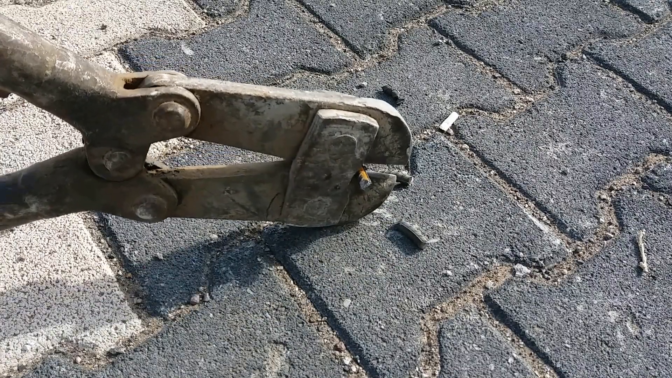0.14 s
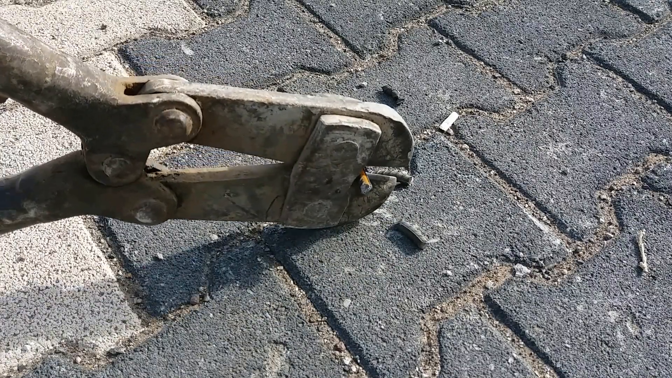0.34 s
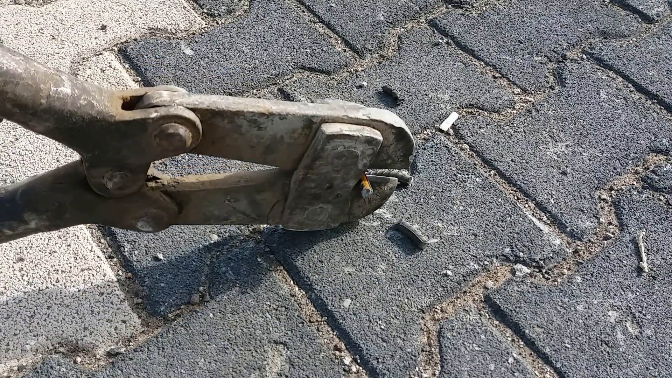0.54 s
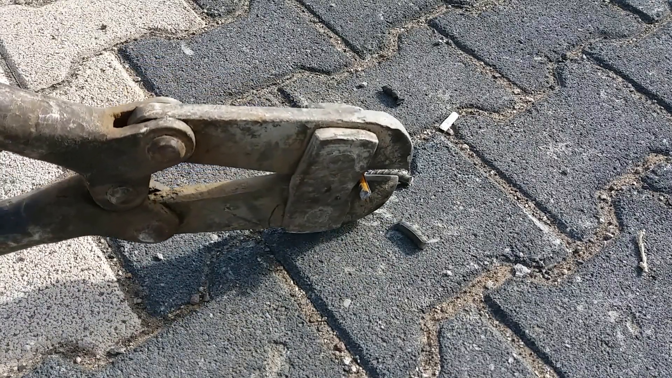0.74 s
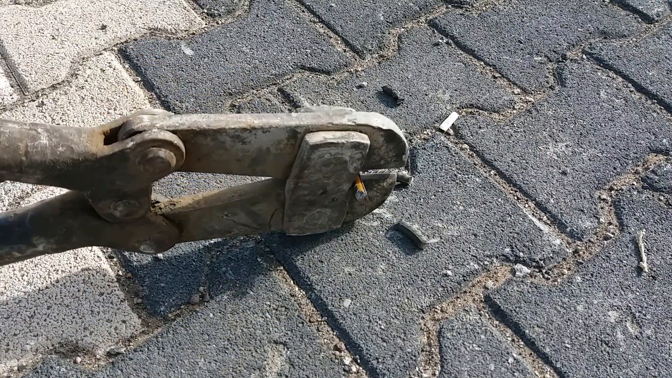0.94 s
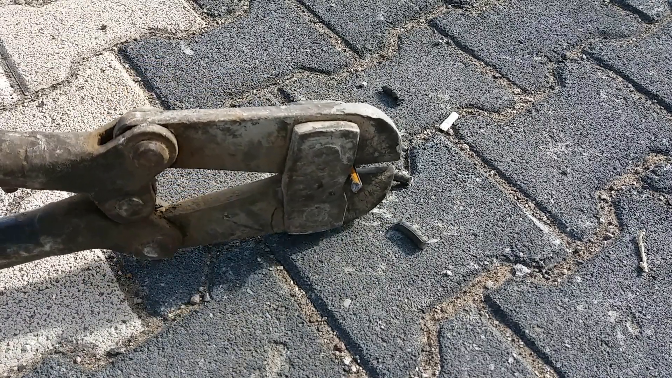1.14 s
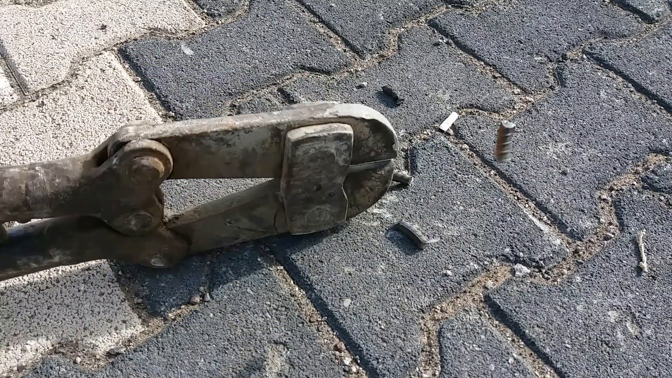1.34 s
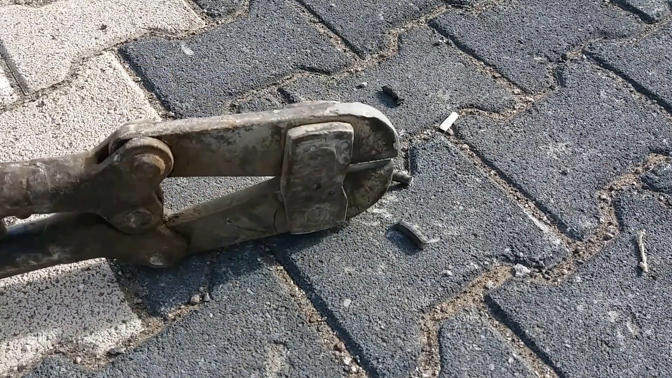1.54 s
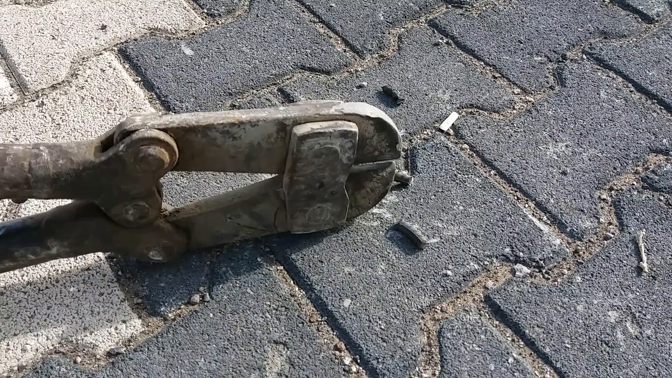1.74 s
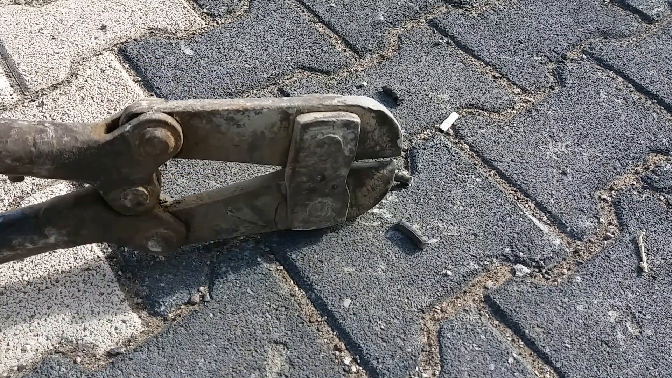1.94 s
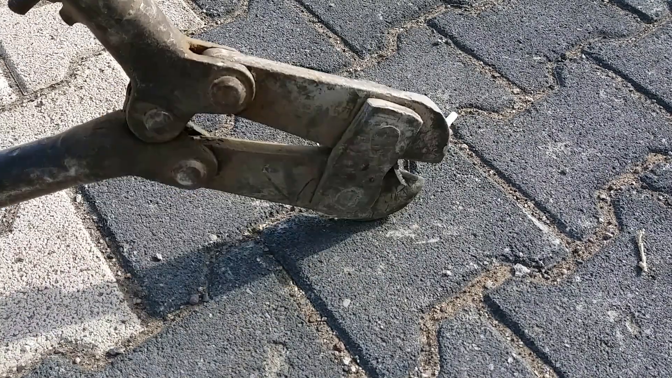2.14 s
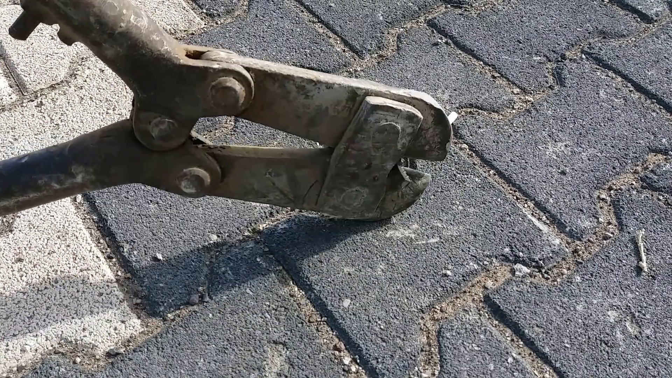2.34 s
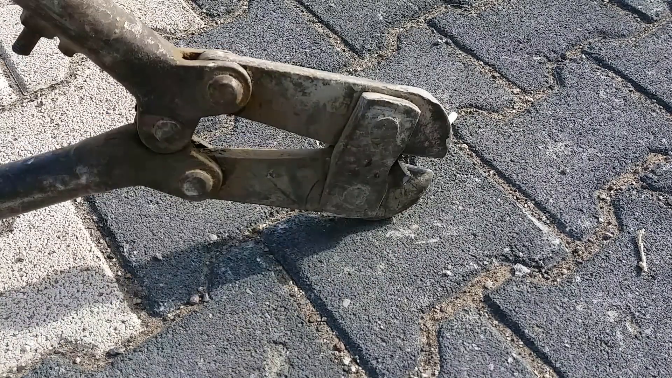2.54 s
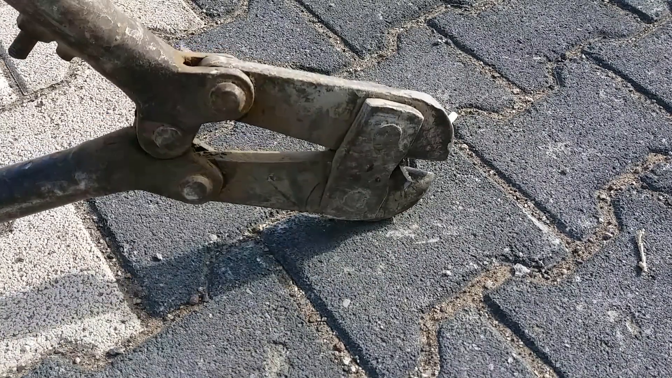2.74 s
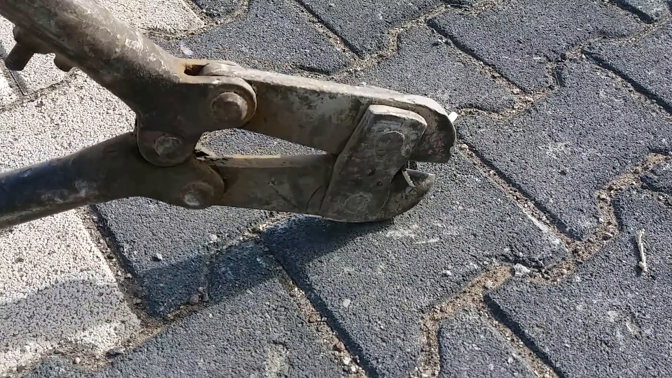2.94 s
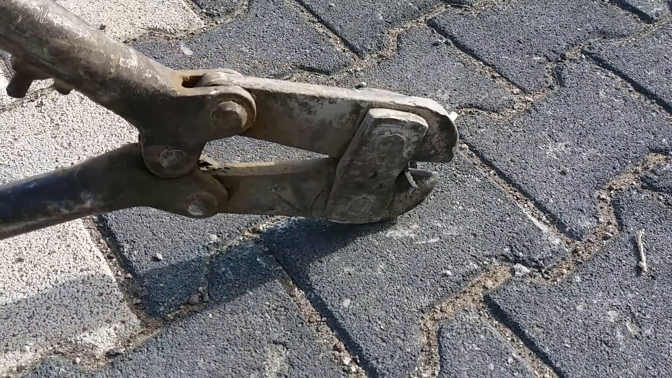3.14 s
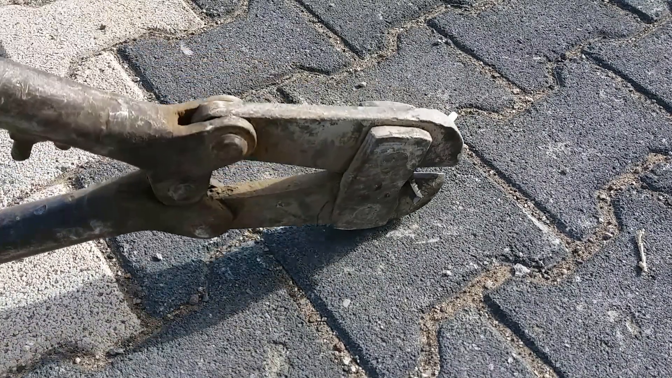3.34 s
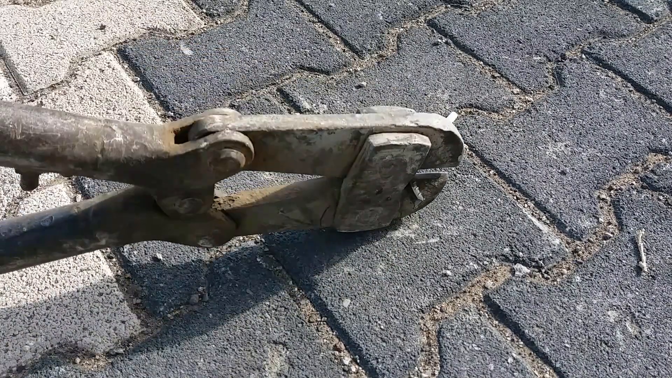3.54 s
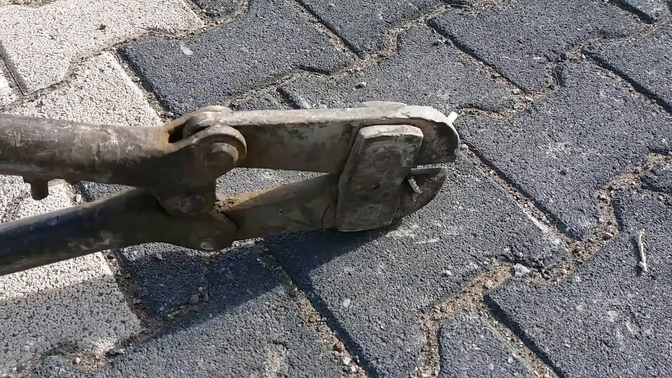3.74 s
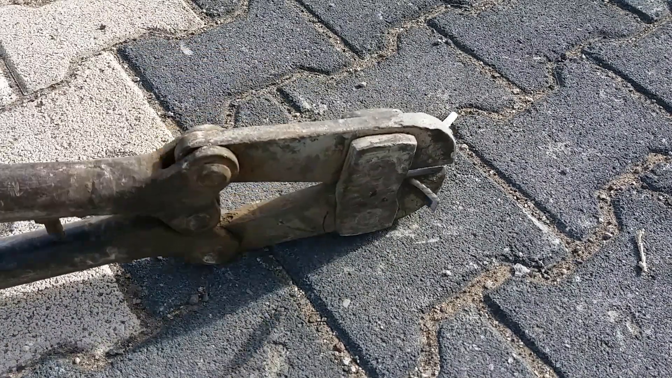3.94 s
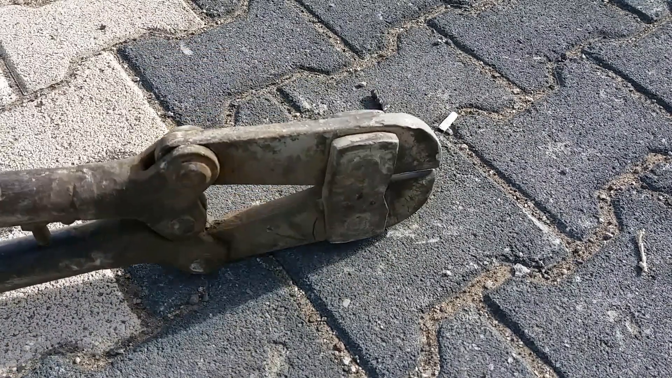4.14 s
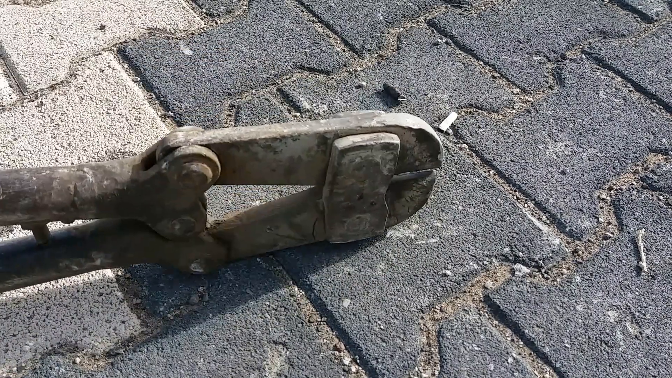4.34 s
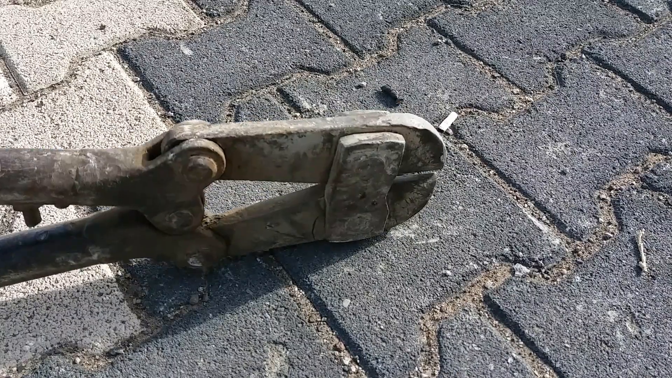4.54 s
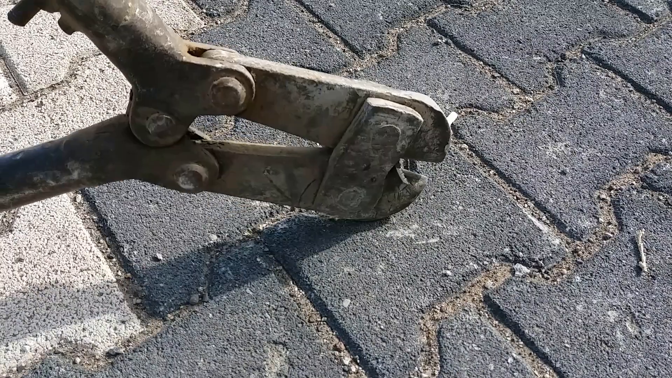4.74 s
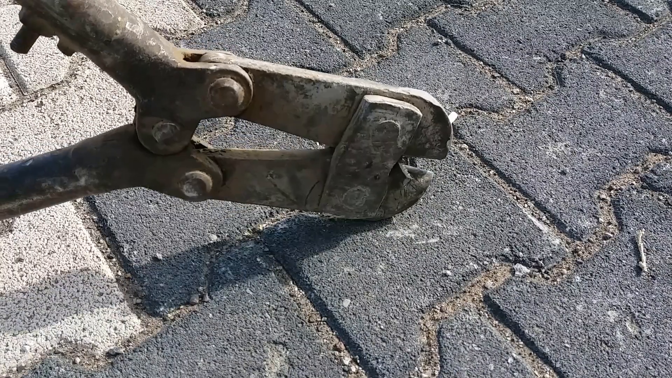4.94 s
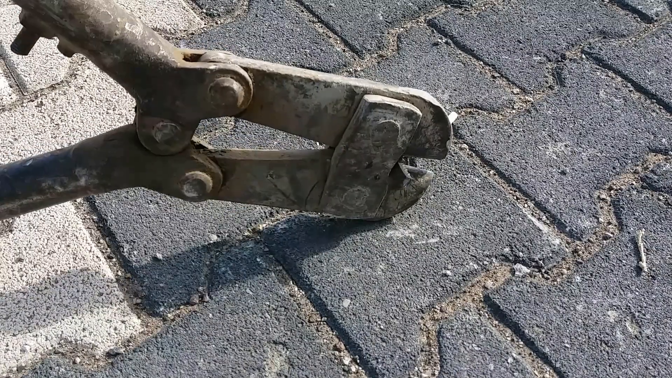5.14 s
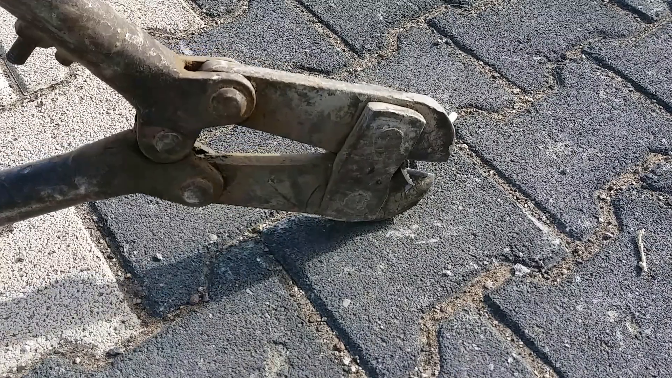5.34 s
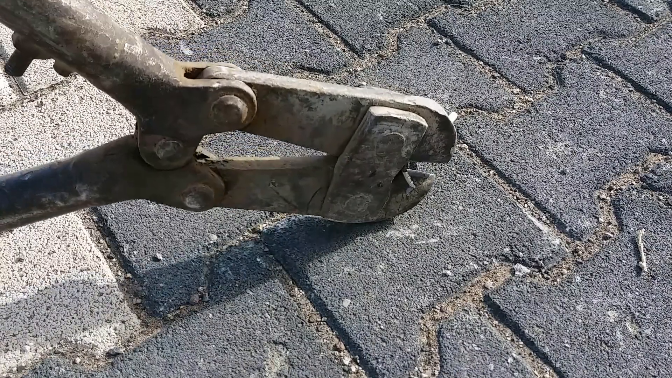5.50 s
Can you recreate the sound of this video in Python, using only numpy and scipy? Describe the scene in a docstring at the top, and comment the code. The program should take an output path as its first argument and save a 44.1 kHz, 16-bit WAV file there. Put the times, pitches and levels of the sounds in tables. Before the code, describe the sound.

Two violent steel snaps with short jaw ring and wall echo, separated by scraping on gritty stone and light ticking metal.

```python
"""Paved yard: large bolt cutters snap two steel rods close to a stereo microphone that clips on the cracks.
Cracks are noise bursts plus ringing jaw modes, echoed by nearby walls; offcuts tick over the stones.
Between cuts, shoes and tool shuffle on the grit to the left: clumped noise through resonances.
Knocks are wavering tones, loose steel chinks are short modes. Shaped noise gives a low rumble that comes
and goes over a quiet outdoor floor. The shuffling passage is played a second time."""
import sys
import numpy as np
from scipy import signal
from scipy.fft import rfft, irfft
from scipy.io import wavfile
from scipy.ndimage import uniform_filter1d

SR = 44100
rng = np.random.default_rng(int(sys.argv[2]) if len(sys.argv) > 2 else 0)


def pcm_store(signal):
    """Save signal as 16-bit PCM."""
    levels = np.round(np.clip(np.atleast_2d(signal), -1, 1) * 32767)
    wavfile.write(sys.argv[1], SR, levels.astype(np.int16).T)


N = 250047
T = np.arange(int(.5 * SR)) / SR  # time axis of one short event [s]
LEFT_LEAD_S = .00036

# blows on the cutter: (time [s], level [dB], treble [dB], ring [dB], share of free ring time [1])
BLOWS = [(1.2986, 4.5, 1.5, 0, 0.26), (1.305, 0, 4, 5.5, 0.13), (1.313, -7, -13, 1, 0.22),
         (1.3343, -1.5, -14, -21, 0.097), (1.3518, 2, -23, -6, 0.11), (1.358, -6, -29, -2, 0.27),
         (1.3782, -22.5, -32, 11.5, 0.54), (3.9648, 1.5, -1, -5, 0.17), (3.973, -4.5, -4, 2.5, 0.12),
         (3.999, -15, -27, -2, 0.048), (4.0176, -18.5, -25, 8, 0.11), (4.047, -0.5, -17, -24, 0.074),
         (4.0544, -10, -13, 1, 0.28)]


def cutter():
    """The rod parts with a crack; the jaws slam, rebound and ring."""
    out = np.zeros((2, N))
    for s, db, treble_db, ring_db, free in BLOWS:
        burst = ears(*crack(2900, treble_db, 0.035), 0.17, LEFT_LEAD_S, 0.93)
        blow = 0.54 * burst + undb(ring_db) * ring(treble_db, free)
        add(out, s, undb(db) * blow)
    return out


# modes of the jaws: (frequency [Hz], relative level [dB], free t60 [s])
JAW_MODES = [(1410, -12, .13), (1840, -3, .24), (1960, -11, .2), (2235, -3, .45), (2335, -8, .3),
             (2550, -9, .2), (3265, -4, .28), (3410, -8, .15), (4455, -4, .24), (5780, -2, .09),
             (6565, -11, .2), (7125, -12, .15), (9685, -11, .15), (10990, -13, .2)]


def ring(treble_db, free, near_hz=1, focus_db_per_octave=0):
    """Jaw modes: dull blows reach the high ones less, loose joints flutter, light taps favour near_hz."""
    hz, db, t60 = np.transpose(JAW_MODES)[:, :, None]
    level_chance, phase_chance, place_chance = rng.standard_normal((3, len(JAW_MODES), 1))
    knots = np.linspace(0, T[-1], 80)
    flutter = np.array([np.interp(T, knots, c) for c in rng.standard_normal((len(JAW_MODES), 80))])
    dullness = min(treble_db, 0) * np.clip((hz - 3500) / 2000, 0, 1)
    focus = focus_db_per_octave * np.abs(np.log2(hz / near_hz))
    db = db + dullness + level_chance + 3.9 * flutter - focus
    # contact with the stone damps most of the ring; a little sings on freely
    damped = np.exp(-np.log(1000) * T / (t60 * max(free, .03)))
    singing = undb(-10.5) * free * np.exp(-np.log(1000) * T / t60)
    envelope = undb(db) * (damped + singing) * (1 - np.exp(-T / 0.00047))
    left = envelope * np.exp(2j * np.pi * (hz * T + phase_chance))
    # each port hears the modes at its own time and from another part of the jaws
    right = left * np.exp(1j * (1.7 * place_chance - 2 * np.pi * hz * LEFT_LEAD_S))
    return np.array([left.imag.sum(0), right.imag.sum(0)]) / 3


def crack(hz, treble_db, t60):
    """Noise burst: broad body around hz, shorter hiss above; two unrelated draws."""
    body_shape = [(hz / 8, -13), (hz / 2, -3), (hz, 0), (hz * 1.32, -5), (hz * 2.22, -20), (22050, -60)]
    draws = []
    for _ in range(2):
        body = colour(rng.standard_normal(len(T)), body_shape) * fade(t60, 0.00026)
        hiss = colour(rng.standard_normal(len(T)), GRIT_SPECTRUM) * fade(0.67 * t60, .0001)
        draws.append(body + undb(treble_db) * hiss)
    return draws


# spectrum of the echo from nearby walls: (frequency [Hz], density [dB per Hz])
ECHO_SPECTRUM = [(100, -3.5), (500, 2), (3000, -4.5), (8000, 0), (16000, -15.5)]
ECHO_DB, ECHO_T60_S = -12, 0.25


def wall_echo(cracks):
    """Nearby walls return the cracks: convolution with decaying noise, one draw per port."""
    echo = []
    for port in cracks:
        tail = colour(rng.standard_normal(len(T)), ECHO_SPECTRUM) * fade(ECHO_T60_S, 0.0028)
        tail = tail / np.sqrt(np.sum(tail ** 2))
        echo.append(signal.fftconvolve(port, tail)[:N])
    return undb(ECHO_DB) * np.array(echo)


# offcuts, grit and loose parts ticking on stone:
# (time [s], level [dB], centre [Hz], treble [dB], jaw ring [dB], left bias [dB before PAN_SHARE])
TICKS = [(1.556, -43.5, 4360, 9.5, 9, -13), (1.5703, -24.5, 3200, 5, -3, -0.5),
         (1.617, -27, 3140, -15, 1, -17), (1.723, -47.5, 4360, 10.5, -0.5, 2.5),
         (1.7331, -34.5, 4340, 6, -4, -15), (2.3134, -28, 2268, 10, -16, 8),
         (2.3244, -14.5, 2420, -15, -18, -1), (2.3430, -14.5, 3260, -4.5, 2, 0.5),
         (2.349, -18, 2580, -6, -8, 14), (2.35, -14.5, 5000, 1, -7, 2), (3.07, -35.5, 3020, 6, -8, 14),
         (3.1183, -28, 1910, -4, -10, -6), (3.4294, -23, 2950, -7.5, -9, 1),
         (3.4852, -36.5, 1960, 4.5, -10, -1.5), (3.945, -28, 3430, -5, -1, 22),
         (4.1551, -9, 2970, -11, -2, 1.5), (4.1801, -13, 2370, -20, -3, -1), (4.293, -44, 2220, -30, 18, 3),
         (4.3369, -22, 3060, -44, 10.5, 11), (4.4742, -22.5, 2160, -54, -2, 1.5),
         (4.5352, -20, 2860, -44, -15, 6), (4.631, -29.5, 2730, -23, 4, 9)]
PAN_SHARE = 0.72


def ticks():
    """Dry contacts that stir the steel briefly; the louder port is also the earlier one."""
    out = np.zeros((2, N))
    for s, db, hz, treble_db, ring_db, pan_db in TICKS:
        lead_s = LEFT_LEAD_S * np.clip(pan_db / 2, -.7, 1)
        burst = ears(*crack(hz, treble_db, 0.0087), 1.0, lead_s, PAN_SHARE * pan_db)
        steel = ring(treble_db, 0.15, hz, focus_db_per_octave=14.0)
        add(out, s, undb(db) * (burst + undb(ring_db) * steel))
    return out


# chinks as the handles load: (time [s], level [dB], ring [dB], click centre [Hz])
CHINKS = [(0.294, -36.5, -18, 1280), (0.4256, -42.5, -18, 2260), (0.449, -44.5, -14, 1530),
          (0.598, -40, -27, 1370), (0.69, -35, -12, 1900), (0.6964, -28.5, -8, 1870),
          (0.783, -31, -35, 805), (0.848, -36, -16, 2580), (0.8703, -36, -20.5, 1870),
          (1.07, -49, -28, 750)]
# modes of the small loose steel part: (frequency [Hz], relative level [dB], t60 [s])
PART_MODES = [(1770, 1.5, 0.023), (4550, 4, 0.032), (8960, -8, 0.039), (10000, 6, 0.056), (10400, 3, 0.057)]


def chinks():
    """A loose part chinks on the left: a short click and a few clear, quickly fading modes."""
    out = np.zeros((2, N))
    hz, mode_db, t60 = np.transpose(PART_MODES)[:, :, None]
    for s, db, ring_db, click_hz in CHINKS:
        level_chance, phase_chance = rng.standard_normal((2, len(PART_MODES), 1))
        envelope = undb(mode_db + 2.0 * level_chance) * np.exp(-np.log(1000) * T / t60)
        modes = envelope * np.sin(2 * np.pi * (hz * T + phase_chance))
        click, other = crack(click_hz, ring_db + 5, 0.016)
        near = undb(ring_db) * modes.sum(0) + click
        add(out, s, undb(db) * ears(near, other, 0.6, LEFT_LEAD_S, 5.0))
    return out


# hollow knocks of soles and handles: (time [s], level [dB], pitch [Hz], length [s])
KNOCKS = [(0.727, -43.5, 287, 0.12), (1.006, -34, 144, 0.0071), (1.094, -27, 129, 0.011),
          (1.296, -14.5, 92, 0.015), (1.337, -16.5, 492, 0.006), (1.559, -29, 524, 0.0019),
          (2.31, -20, 412, 0.011), (2.324, -16, 510, 0.0039), (2.810, -17, 825, 0.021),
          (2.85, -22, 288, 0.0072), (3.035, -37, 700, 0.059), (3.115, -19, 838, 0.029),
          (3.435, -18.5, 796, 0.0058), (3.969, -15, 697, 0.014), (4.008, -15, 490, 0.004),
          (4.016, -11.5, 800, 0.004), (4.048, -11.5, 845, 0.01), (4.137, -29.5, 605, 0.0075),
          (4.182, -19, 690, 0.0031), (4.369, -31.5, 1024, 0.013), (4.337, -16.5, 854, 0.0049),
          (4.474, -26.5, 540, 0.002), (4.535, -14.5, 686, 0.0035)]


def knocks():
    """A hollow, wavering tone held while the contact lasts, in a dull noise burst."""
    out = np.zeros((2, N))
    for s, db, hz, length_s in KNOCKS:
        rise = 1 - np.exp(-T / (0.082 * length_s))
        shape = rise * np.exp(-(T / max(length_s, .002)) ** 3.4)
        waver = .03 * np.cumsum(rng.standard_normal(len(T)))
        burst, other = crack(1.69 * hz, -60.5, 3 * length_s)
        near = shape * np.sin(2 * np.pi * hz * T + waver) + undb(-4.5) * burst
        pan_db = -5.5 * max(np.log2(240 / hz), 0)  # the lowest are louder on the right
        add(out, s, undb(db) * ears(near, other, 0.84, LEFT_LEAD_S, pan_db))
    return out


# hollow resonances of the drag: (frequency [Hz], width [Hz], relative level [dB])
DRAG_MODES = [(260, 60, -5.5), (309, 132, -3.5), (398, 140, -4.5), (481, 220, -2), (694, 373, -5),
              (900, 590, 0.5)]
# rasp of stone: (frequency [Hz], density [dB per Hz])
RASP_SPECTRUM = [(600, -6), (1200, 9.5), (2000, 9.5), (2800, 0), (4500, -1.5), (7000, -23), (10000, -37)]
# hiss of fine grit, also in the cracks: (frequency [Hz], density [dB per Hz])
GRIT_SPECTRUM = [(2500, -6.5), (5000, -3.5), (7500, -4), (10000, -1), (13000, -3), (15000, -4), (16500, -8)]
STEEL_DB = -8  # grit nicking the jaws, against the rasp gain


def shuffle():
    """Stick-slip contacts excite hollow drag and stone rasp; grit nicks the jaws and hisses above."""
    drag, rasp, grit = scuffing()
    hollow = [hollow_drag() for _ in range(2)]
    out = drag * ears(*hollow, 0.93, LEFT_LEAD_S, 0.36)
    stone = [colour(patches(610, count=9, scatter_db=5.0, length_s=.006), RASP_SPECTRUM) for _ in range(2)]
    out += rasp * ears(*stone, 0.33, LEFT_LEAD_S, 3.2) * undb(2.0)
    peaks = [(hz, 0.023 * hz, db - 10.0 * np.log2(hz / 2000)) for hz, db, _ in JAW_MODES[:9]]
    steel = [resonate(nicks(), peaks) for _ in range(2)]
    out += rasp * ears(*steel, 0.24, LEFT_LEAD_S, 1.5) * undb(STEEL_DB)
    hiss = [colour(grains(1.5, 0.0035), GRIT_SPECTRUM) for _ in range(2)]
    return out + grit * ears(*hiss, 0.02, LEFT_LEAD_S, 4.6) * undb(2.5)


def hollow_drag():
    """Each drag resonance is excited by its own clumped contacts; rms 1."""
    return unit(sum(undb(db) * resonate(grains(3.84, .01), [(hz, width, 0)]) for hz, width, db in DRAG_MODES))


def patches(lo_hz, count, scatter_db, length_s):
    """Half-octave bands, each clumping on its own: a scrape wanders over many small resonances."""
    bands = lo_hz * 2 ** (np.arange(count) / 2)
    return sum(np.sqrt(hz) * resonate(grains(scatter_db, length_s), [(hz, hz / 1.9, 0)]) for hz in bands)


NICKS_PER_S = 300


def nicks():
    """Grains of grit nick the jaws: clicks at random times, a few much louder than the rest."""
    hits = rng.random(N) < NICKS_PER_S / SR
    return hits * undb(4.4 * rng.exponential(size=N)) * np.sign(rng.standard_normal(N))


# faint scraping between scuffs: (time [s], drag level [dB])
SCRAPING = [(0.66, -63.5), (0.98, -52), (1.05, -49.5), (1.42, -52), (1.65, -55), (1.9, -63.5), (2.15, -54),
            (2.75, -53.5), (3.015, -54.5), (3.06, -90), (3.6, -54), (3.9, -57), (4.4, -60.5), (4.69, -45.5)]
SCRAPING_RASP_DB, SCRAPING_GRIT_DB = -2.5, -12.5  # against the drag
# scuffs on the stone: (time of full strength [s], hold [ms], drag release [ms per 20 dB, at least 10],
# drag [dB], rasp [dB], grit [dB])
SCUFFS = [(0.698, 61, 69, -55, -52.5, -59), (2.214, 17, 125, -34, -43, -60.5),
          (2.318, 18, 61, -30, -35, -37), (2.36, 42, 499, -47, -44.5, -45),
          (2.475, 23, 50, -39.5, -43.5, -42), (2.503, 49.3, 94, -31, -38.5, -39),
          (2.684, 27, 102, -42, -60, -58), (2.786, 42, 27, -34.5, -45.5, -53.5),
          (2.815, 59, 132, -31.5, -39.5, -54), (3.035, 40, 476, -38, -46.5, -59.5),
          (3.092, 19, 237, -33, -47, -69), (3.123, 7.1, 168, -26, -36.5, -54),
          (3.265, 56, 423, -40, -47.5, -54), (3.399, 31, 27, -33.5, -46, -61),
          (3.434, 15.5, 158, -28, -37, -57), (3.747, 34, 59, -48.5, -45, -44.5),
          (3.939, 58, 901, -40.5, -47, -54), (4.032, 11, 233, -35.5, -34.5, -61),
          (4.136, 61.4, 45, -38, -37.5, -37.5), (4.255, 24, 22, -44, -57, -50.5),
          (4.293, 64, 50, -47, -44, -63), (4.547, 12, 146, -45.5, -49, -81)]
SCUFF_RISE_MS = 13  # over the last 20 dB, steep at first, then rounded
RASP_RELEASE, GRIT_RELEASE = 0.75, 0.56  # shares of the drag release


def scuffing():
    """Gains of drag, rasp and grit: each scuff rises, holds and releases over the faint scraping."""
    t = np.arange(N) / SR
    power = (curve(SCRAPING)[0] * undb([[0], [SCRAPING_RASP_DB], [SCRAPING_GRIT_DB]])) ** 2
    share = np.array([[1], [RASP_RELEASE], [GRIT_RELEASE]])
    for s, hold_ms, release_ms, *db in SCUFFS:
        near = slice(int((s - .2) * SR), int((s + .8) * SR))
        after_ms = 1000 * (t[near] - s)
        rise = np.maximum(-after_ms, 0) / SCUFF_RISE_MS
        fall = np.maximum(after_ms - hold_ms, 0) / (max(release_ms, 10) * share)
        power[:, near] += undb(np.array(db)[:, None] - 20 * (rise ** 2 + fall)) ** 2
    return np.sqrt(power)


# low bumps: (time [s], level [dB])
BUMPS = [(0.0, -56.5), (0.57, -56), (0.68, -51), (0.73, -41), (0.88, -45), (1.0, -41), (1.12, -31.5),
         (1.21, -48), (1.31, -27.5), (1.48, -54.5), (1.9, -64), (2.15, -53), (2.3, -51), (3.01, -55),
         (3.5, -41), (3.85, -50.5), (4.42, -52.5), (4.69, -44)]
# rumble: (frequency [Hz], density [dB per Hz])
RUMBLE_SPECTRUM = [(25, -25), (50, -5.5), (100, 7), (150, 3.5), (290, -4.5), (450, -34)]
SCUFF_RUMBLE_DB = -11  # rumble that a scuff sets off, against its drag


def rumble():
    """Low noise in bumps, partly set off by scuffs; only partly alike at the ports, a touch more right."""
    gain = np.hypot(curve(BUMPS)[0], undb(SCUFF_RUMBLE_DB) * scuffing()[0])
    noise = [colour(grains(5.14, .02), RUMBLE_SPECTRUM) for _ in range(2)]
    return gain * ears(*noise, 0.62, LEFT_LEAD_S, -0.5)


# outdoor floor: (frequency [Hz], density [dB per Hz])
YARD_SPECTRUM = [(25, -4), (48, -4), (123, -4.5), (236, -11.5), (863, -10), (1330, -21), (2480, -17),
                 (6380, -31), (14800, -32.5), (16000, -50.5)]
YARD_DB = -57


def yard():
    """Quiet outdoor floor of clumped noise, slightly from the left."""
    noise = [colour(grains(4.5, 0.017), YARD_SPECTRUM) for _ in range(2)]
    return undb(YARD_DB) * ears(*noise, 0.2, LEFT_LEAD_S, 1.3)


def undb(db):
    """Gain of a dB value."""
    return 10 ** (np.asarray(db) / 20)


def unit(x):
    """Scaled to rms 1."""
    return x / np.sqrt(np.mean(x ** 2))


def colour(x, points):
    """Shapes x by (Hz, dB) points, 90 dB down below the first; rms 1."""
    hz, db = np.transpose(points)
    f = np.arange(len(x) // 2 + 1) * SR / len(x) + 1  # +1 Hz avoids log(0)
    gain = undb(np.interp(np.log(f), np.log(hz), db, left=-90))
    return unit(irfft(rfft(x) * gain, len(x)))


def resonate(x, peaks):
    """Sum of (Hz, width Hz, dB) resonances, each applied twice for steep skirts; rms 1."""
    out = 0
    for hz, width, db in peaks:
        b, a = signal.iirpeak(hz, hz / width, SR)
        once = signal.lfilter(b, a, x)
        out = out + undb(db) * signal.lfilter(b, a, once)
    return unit(out)


def grains(scatter_db, length_s):
    """Dense contacts in clumps: noise whose level wanders at random, smoothed over length_s."""
    hold = max(int(length_s * SR), 1)
    steps = undb(scatter_db * rng.standard_normal(N // hold + 1))
    size = np.repeat(steps, hold)[:N]
    return uniform_filter1d(size, hold) * rng.standard_normal(N)


def fade(t60, rise_s):
    """Quick rise, then exponential decay."""
    return np.exp(-np.log(1000) * T / max(t60, .003)) * (1 - np.exp(-T / rise_s))


def curve(table):
    """Gains over time from (s, dB, ..) rows."""
    s, *columns = np.transpose(table)
    return [undb(np.interp(np.arange(N) / SR, s, c)) for c in columns]


def ears(x, other, likeness, lead_s, pan_db):
    """One source at two ports: the far one hears it later, partly by another path; plus is left."""
    far = likeness * x + np.sqrt(1 - min(likeness, 1) ** 2) * other
    lag = int(abs(lead_s) * SR)
    far = np.concatenate([np.zeros(lag), far[:len(far) - lag]])
    pair = np.array([x, far] if lead_s >= 0 else [far, x])
    return pair * undb([[pan_db / 2], [-pan_db / 2]])


def add(out, s, x):
    """Mixes x into out from time s."""
    i = int(s * SR)
    out[:, i:i + x.shape[1]] += x[:, :N - i]


REPEAT_FROM_S, REPEAT_AT_S = 2.185, 4.685


def scene():
    """All layers summed; the shuffling passage returns unchanged at the end."""
    cracks = cutter()
    contacts = ticks() + chinks() + knocks() + shuffle()
    out = cracks + wall_echo(cracks) + contacts + rumble() + yard()
    a, b = int(REPEAT_FROM_S * SR), int(REPEAT_AT_S * SR)
    return np.concatenate([out[:, :b], out[:, a:a + N - b]], axis=1)


TOP_HZ, BASS_HZ = 16100, 38


def record(dry):
    """The deepest bass is cut, the cracks overload the input, then the top is cut."""
    bass = signal.butter(2, BASS_HZ, "high", fs=SR, output="sos")
    top = signal.ellip(8, .2, 60, TOP_HZ, fs=SR, output="sos")
    overloaded = np.clip(signal.sosfilt(bass, dry), -1, 1)
    return np.clip(signal.sosfilt(top, overloaded), -1, 1)


dry = scene()
out = record(dry)
pcm_store(out)
```